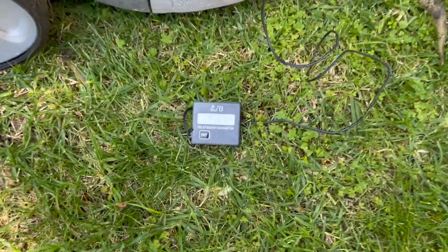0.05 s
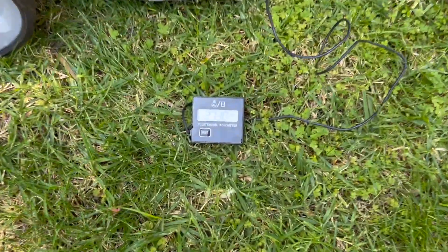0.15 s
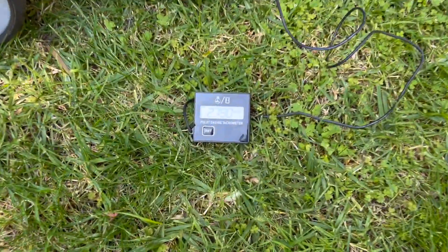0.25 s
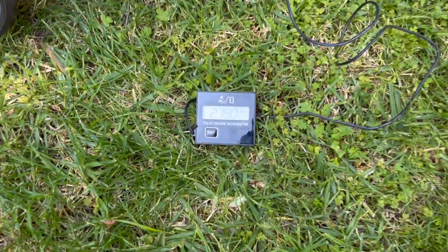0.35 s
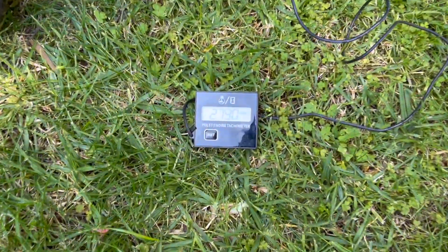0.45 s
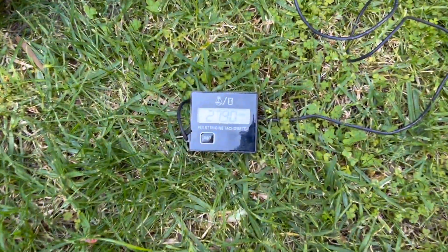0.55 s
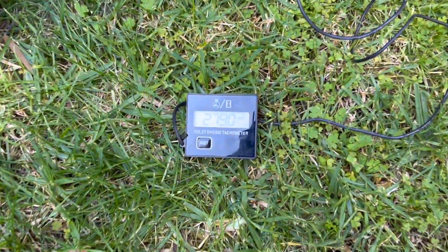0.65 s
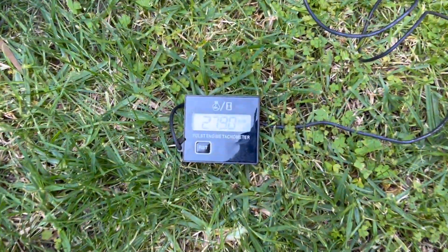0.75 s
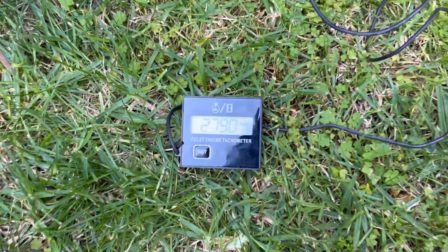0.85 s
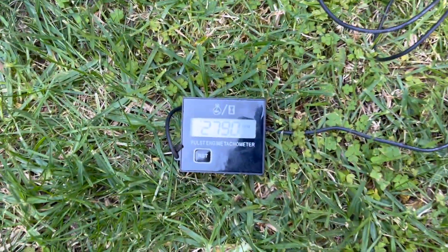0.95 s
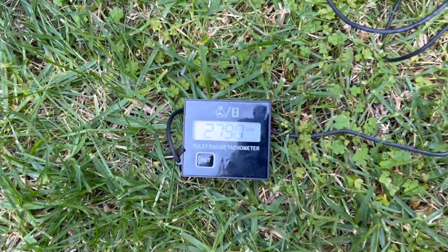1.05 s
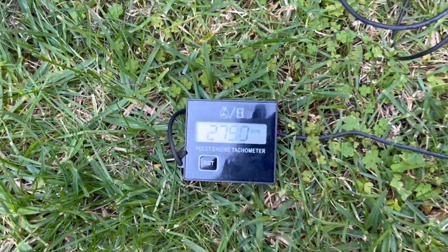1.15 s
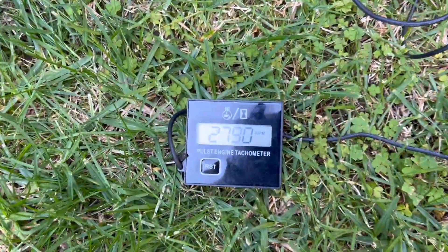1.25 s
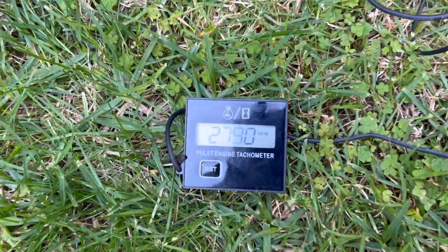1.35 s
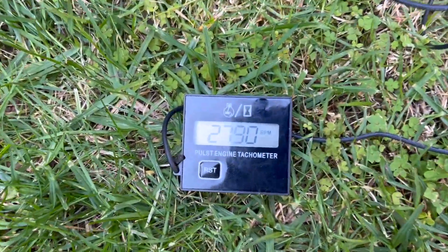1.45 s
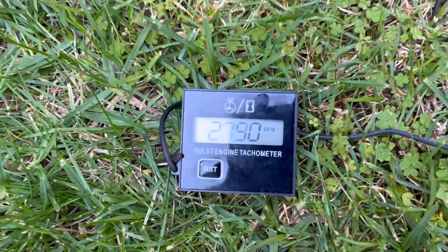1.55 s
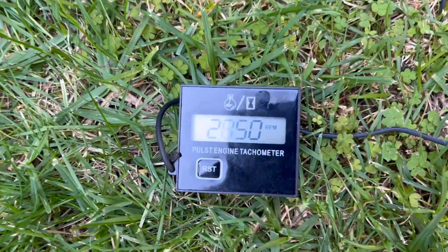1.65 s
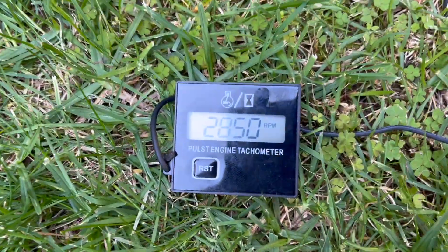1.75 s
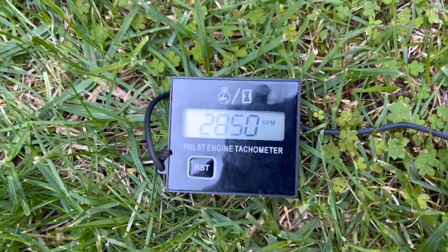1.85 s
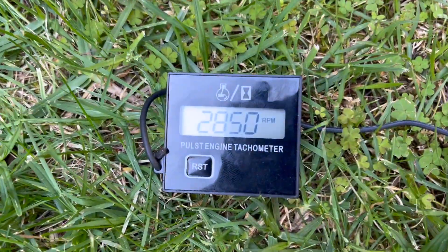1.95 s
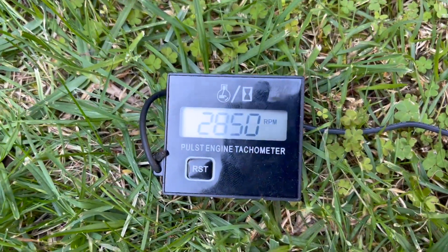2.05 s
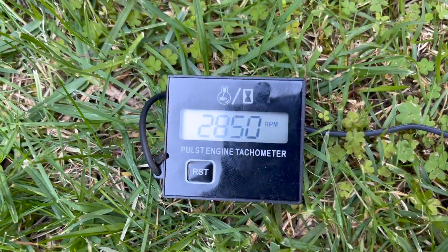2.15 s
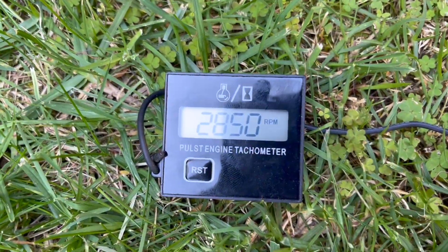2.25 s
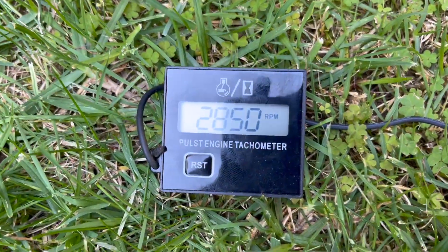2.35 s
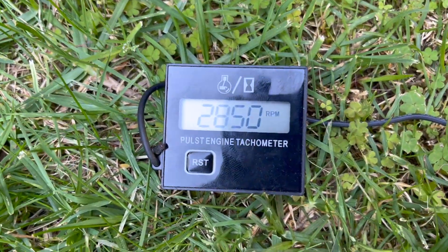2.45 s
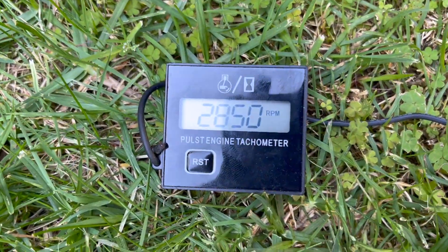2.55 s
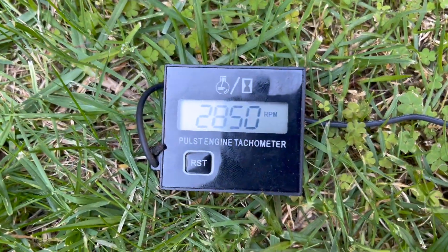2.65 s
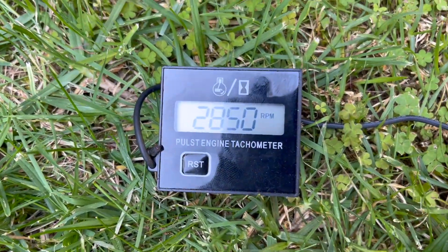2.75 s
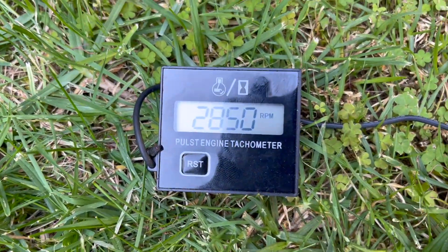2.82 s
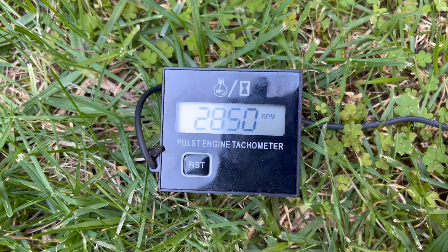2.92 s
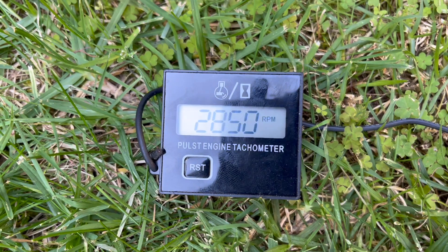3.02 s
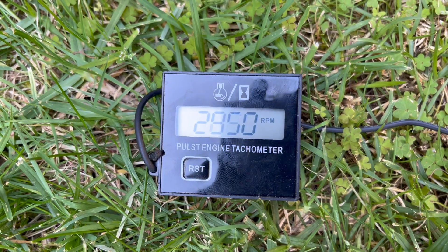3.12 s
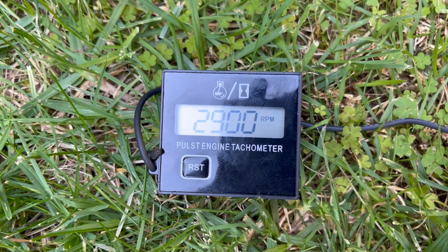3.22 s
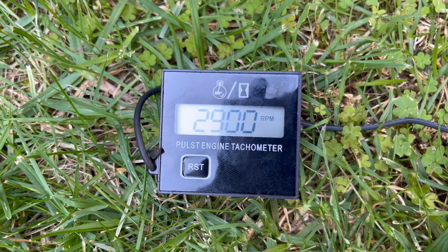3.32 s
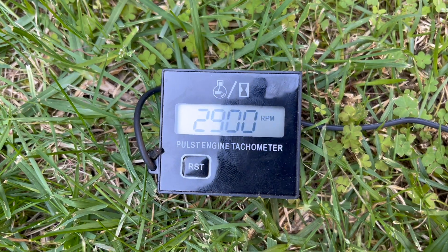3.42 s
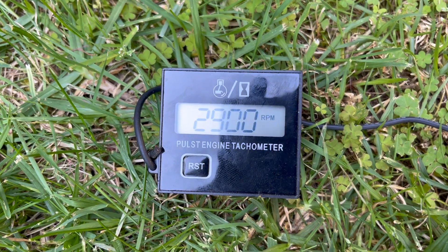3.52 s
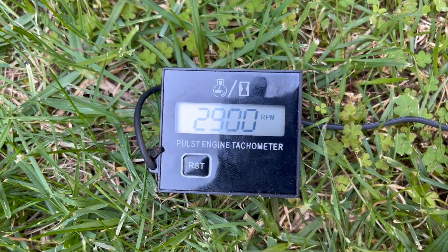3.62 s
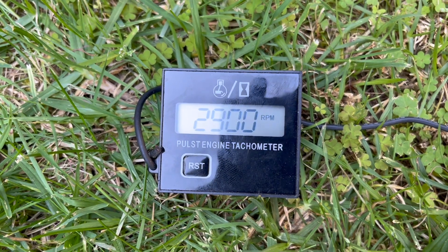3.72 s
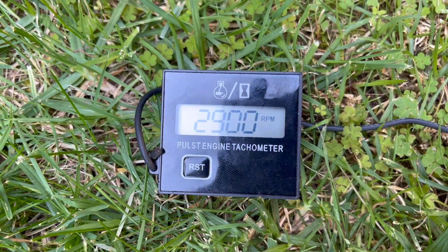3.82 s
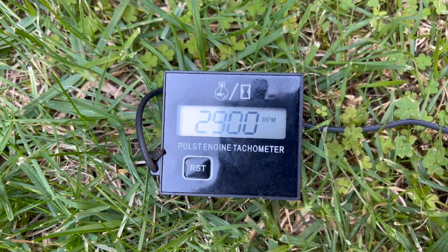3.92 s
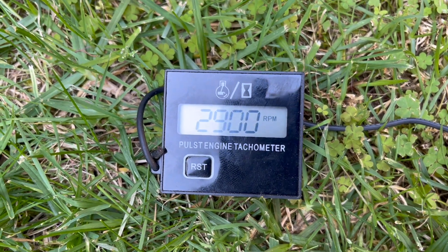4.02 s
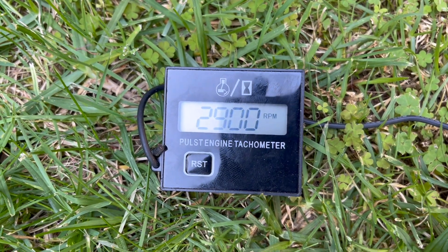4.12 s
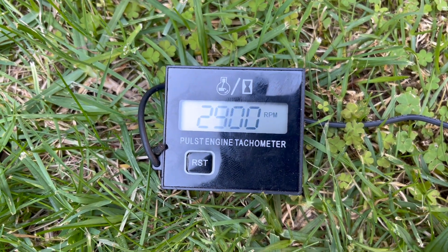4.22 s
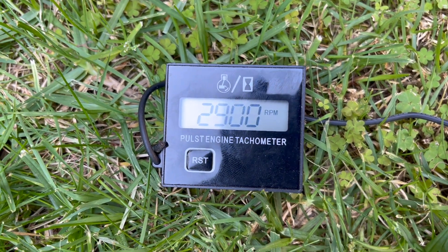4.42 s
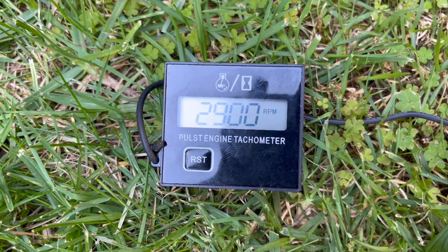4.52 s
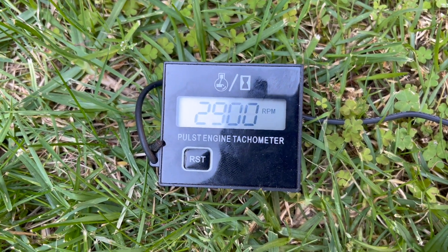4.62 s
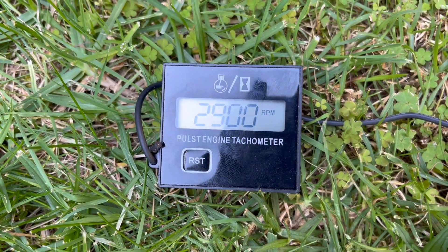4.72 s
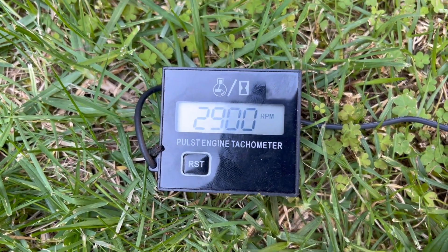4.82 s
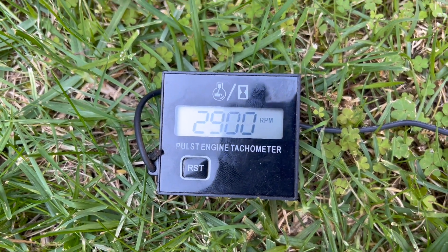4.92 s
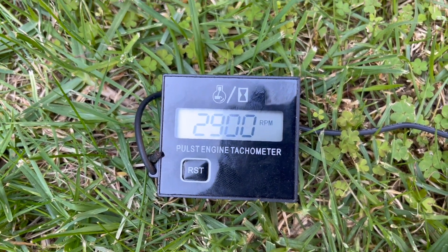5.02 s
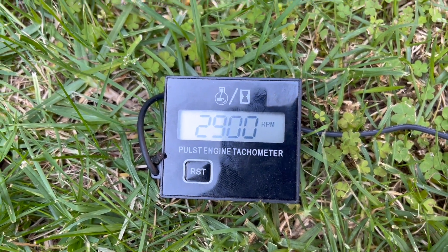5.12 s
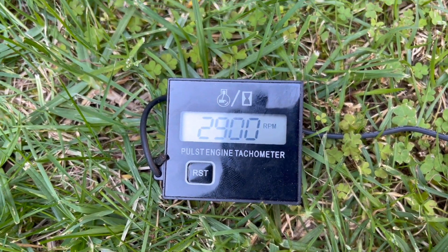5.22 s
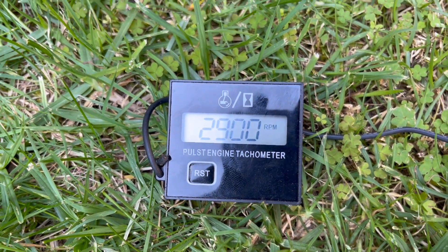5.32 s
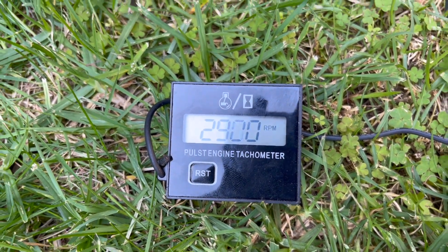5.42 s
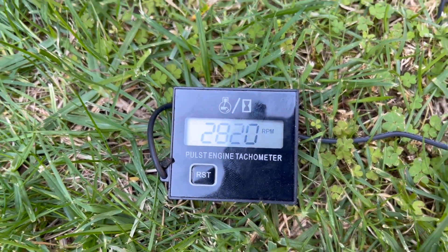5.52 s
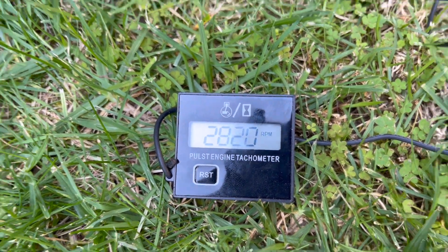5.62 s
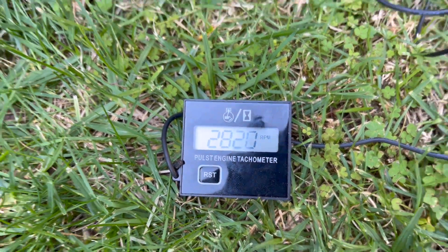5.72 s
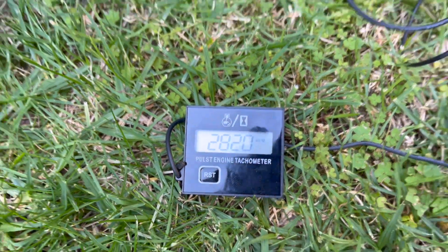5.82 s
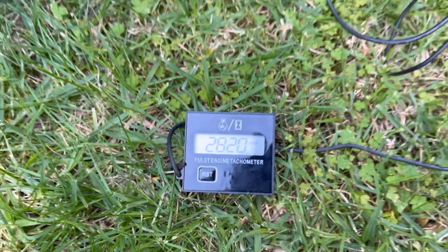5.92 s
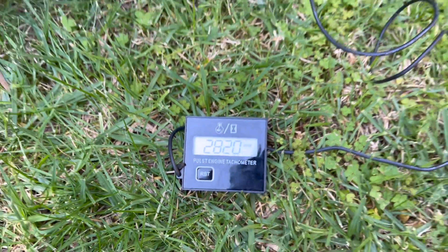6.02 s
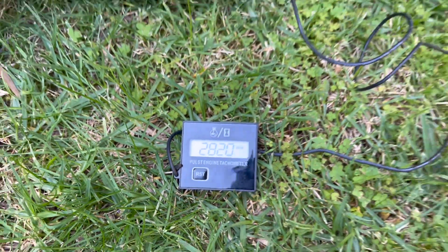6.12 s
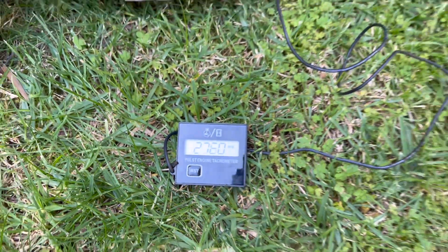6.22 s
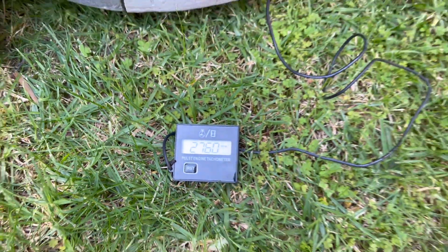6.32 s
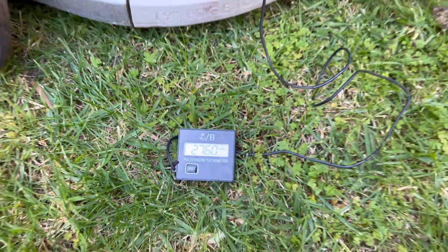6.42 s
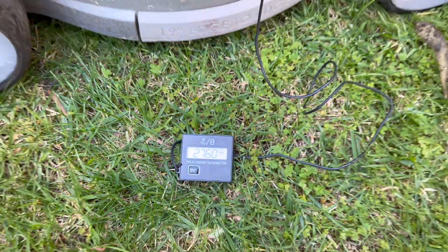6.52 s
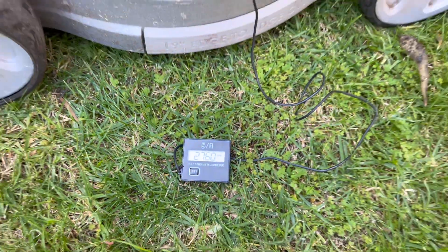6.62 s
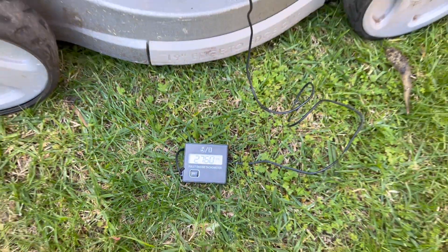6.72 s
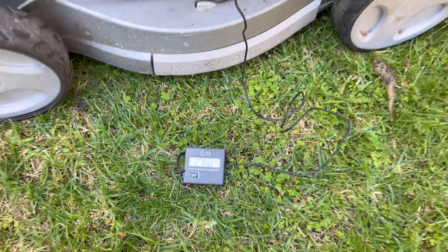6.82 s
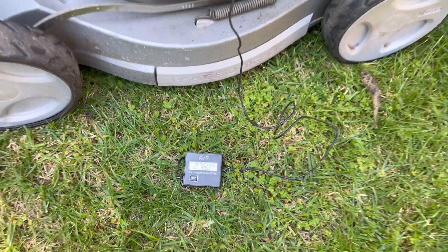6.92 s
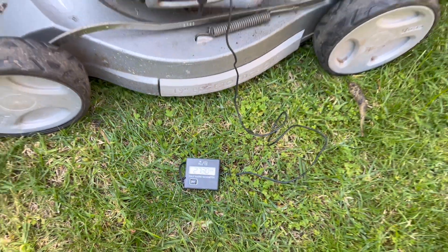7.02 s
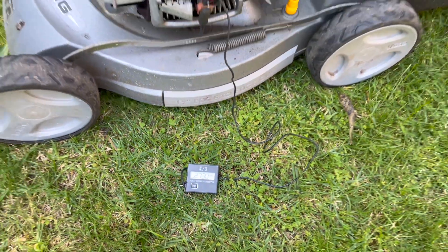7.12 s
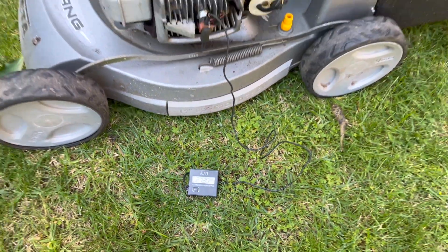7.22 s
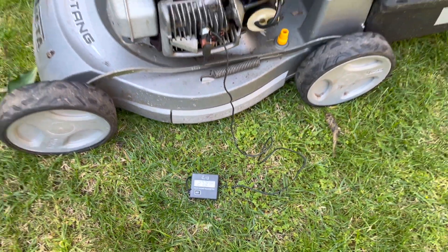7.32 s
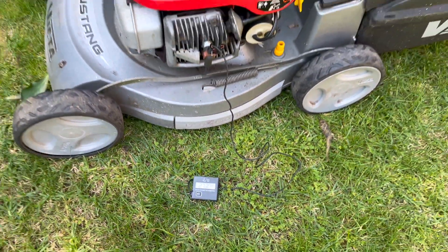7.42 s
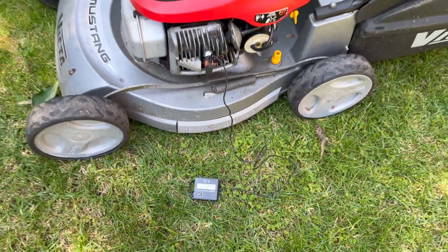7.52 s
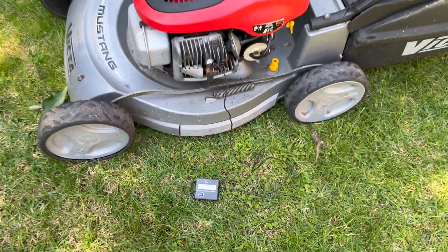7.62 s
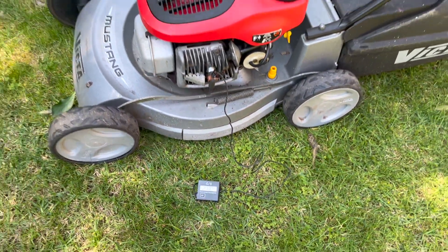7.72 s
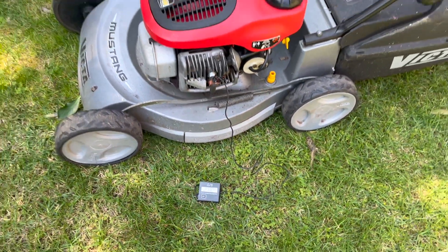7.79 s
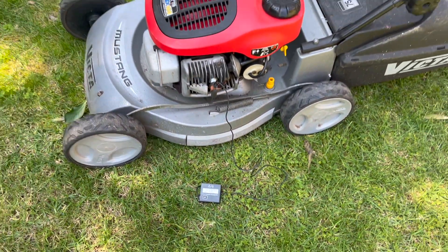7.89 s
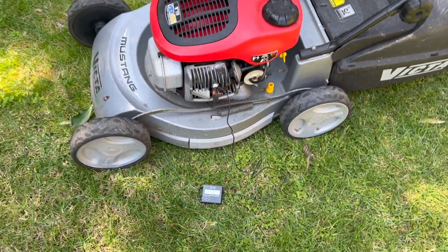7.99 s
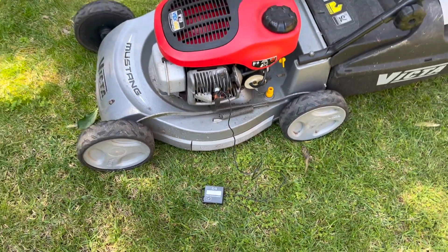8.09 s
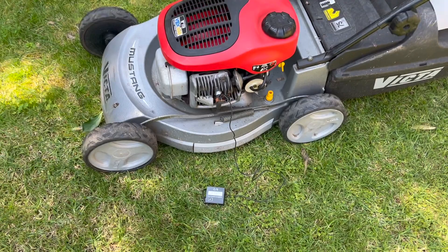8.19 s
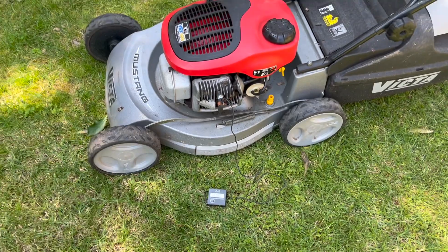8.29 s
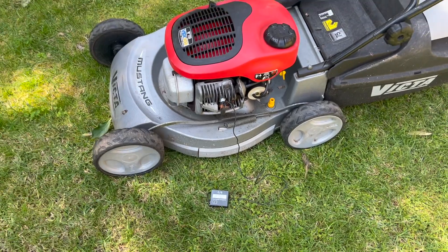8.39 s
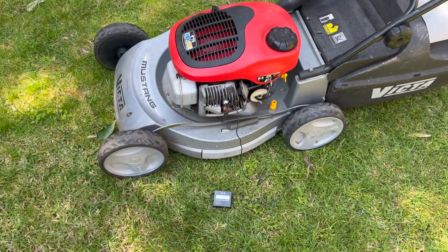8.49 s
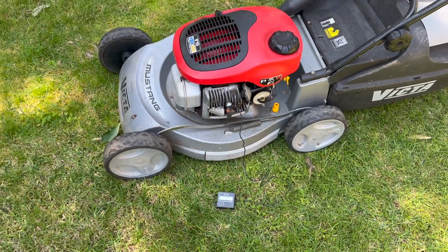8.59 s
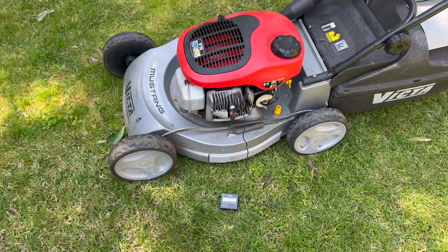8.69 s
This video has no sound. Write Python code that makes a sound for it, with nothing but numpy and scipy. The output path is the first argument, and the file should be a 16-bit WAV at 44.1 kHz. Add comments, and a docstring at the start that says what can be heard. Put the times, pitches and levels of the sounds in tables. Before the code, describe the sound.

A small two-stroke lawn mower runs unloaded on grass from the first instant, loud and fairly near a hand-held stereo microphone. From 0 to 2.4 seconds it hunts: sharp raspy exhaust barks, each with a tiny chirp and hiss, stumble in uneven clusters over muffler thumps. Under them lie a steady low hum near 190 hertz, a deep throb and churned, swishing air. The pitch lifts very slightly to about 3 seconds. From 2.4 to 5 seconds the firing becomes an even putter, roughly twelve a second, with softer barks; close up, dry metallic rattle shows and the treble leans left. Around 5 seconds the rhythm trips, then quickens to about sixteen a second while pitch sags a little. From 6 seconds the microphone backs away: hum, air and thumps fade markedly, leaving a thinner, duller putter. Near 7.7 to 8.1 it stumbles again, still running at the cut, 8.75 seconds.

```python
"""On grass, a two-stroke lawn mower turns 46 to 49 times a second, heard by a hand-held microphone pair
that stoops close and then draws back. Unloaded, it hunts at first, then fires mostly every third or
fourth turn: each firing kicks the shaft, thumps in the muffler and barks at the outlet with a chirp and
a hiss of noise. Beneath, harmonics of the shaft speed make the blade's hum, shaped noise makes the air
churned in the deck, and noise bursts at fixed shaft angles ring the barrel as the piston rattles."""
import sys
import numpy as np
from scipy import signal
from scipy.fft import rfft, irfft, next_fast_len
from scipy.io import wavfile
from scipy.ndimage import map_coordinates

SR = 44100
rng = np.random.default_rng(int(sys.argv[2]) if len(sys.argv) > 2 else 0)


def wav_out(sig):
    """Save sig, one row per channel (or a flat mono array), as 16-bit PCM at SR to the path in sys.argv[1]."""
    wavfile.write(sys.argv[1], SR, np.round(np.clip(np.atleast_2d(sig).T, -1, 1) * 32767).astype(np.int16))


N = 385858

# Base loudness of the parts at the microphones, before trims and beaming. Each row: time in seconds,
# then blade hum, muffler thump, churned air, machinery and outlet ring in dB.
PART_LEVELS = [(0, -15.5, -20.5, -22.5, -32.5, -7.5), (1.1, -16.5, -20, -23.5, -35, -5.5),
               (2.7, -16, -21.5, -25.5, -38, -13), (5.1, -19.5, -24.5, -28.5, -41, -15),
               (6.15, -23, -25.5, -29.5, -42.3, -9.5), (7, -28.5, -31.5, -33.5, -46, -19.5),
               (7.9, -31.5, -37, -37, -47, -16.5), (8.75, -32.5, -36, -38.5, -47, -16)]
# Speed of the shaft, before the surges of firing. Each row: time in seconds, speed in turns per second.
SHAFT_SPEED = [(0, 47.73), (.45, 47.45), (1.05, 47.96), (1.35, 47.47), (2.4, 48.01), (2.9, 48.77),
               (3.3, 48.68), (4.8, 47.77), (5.7, 46.21), (7.2, 46.77), (7.6, 47.32), (8.75, 46.93)]
# Narrow beams that the microphones pass through. Each row: time in seconds, outlet's upper ring in dB,
# fin ring in dB relative to the machinery.
NARROW_BEAMS = [(0, 1, -7), (.8, 2.5, -4), (1.7, 0, -9.5), (3.3, 4, -7.5), (5.2, 2, -9), (6.4, 0, -5),
                (7.4, -8, -9.5), (8.75, -18, -14)]


def amp(db):
    """Amplitude ratio: twenty decibels to each factor of ten."""
    return 10 ** (np.asarray(db) / 20)


def unit(x):
    """Normalisation to an rms of 1."""
    return x / np.sqrt(np.mean(x ** 2) + 1e-20)


def along(points, hz):
    """Interpolation of (Hz, value) points on a logarithmic frequency axis."""
    f, v = np.transpose(points)
    return np.interp(np.log(hz + 1), np.log(f + 1), v)


def curves(rows):
    """Linear interpolation in time: one value per sample for each column after the seconds."""
    seconds, *columns = np.transpose(rows)
    return [np.interp(np.arange(N) / SR, seconds, column) for column in columns]


def wobble(rate):
    """Slow random fluctuation: a smooth curve through `rate` random knots a second."""
    knots = rng.standard_normal(int(N * rate / SR) + 4)
    return map_coordinates(knots, [np.arange(N) * rate / SR])


def filtered(x, response):
    """Linear filtering: the spectrum of x times a complex response of frequency."""
    m = next_fast_len(N + SR // 4, True)
    return irfft(rfft(x, m) * response(np.fft.rfftfreq(m, 1 / SR)), m)[..., :N]


def coloured(x, spectrum):
    """Spectral shaping by a gain in dB, with no phase shift."""
    return filtered(x, lambda hz: amp(along(spectrum, hz)))


def rung(x, modes):
    """Modal resonance: parallel second-order band-passes of alternating sign."""
    def response(f):
        total = 0
        for k, (centre, width, db) in enumerate(modes):
            damping = 1j * f * width
            total = total + (-1) ** k * amp(db) * damping / (centre * centre - f * f + damping)
        return total
    return filtered(x, response)


def causal(spectrum, size=16384):
    """Minimum phase: folding the cepstrum gives the promptest impulse response with this spectrum."""
    cepstrum = irfft(np.log(amp(along(spectrum, np.fft.rfftfreq(size, 1 / SR)))))
    cepstrum[1:size // 2] *= 2
    cepstrum[size // 2 + 1:] = 0
    return irfft(np.exp(rfft(cepstrum)))


def turbulence():
    """Partial coherence: white noise at two microphones, mixed from independent mid and side."""
    # Likeness of the two channels. Each row: frequency in Hz, correlation from 0 to 1.
    likeness = [(100, 0.82), (300, 0.78), (650, 0.67), (1000, 0.72), (1500, 0.064), (2000, 0.58),
                (5000, 0.5), (6500, 1), (7600, 1)]

    def shares(hz):
        turn = np.arccos(np.clip(along(likeness, hz), -1, 1)) / 2
        return np.array([np.cos(turn), np.sin(turn)])
    mid, side = filtered(rng.standard_normal((2, N)), shares)
    return np.array([mid + side, mid - side])


def at_firings(times, sizes, shape):
    """Superposition: one scaled copy of the shape at each firing."""
    places = np.round(times * SR).astype(int)
    impulses = np.bincount(np.maximum(places, 0), sizes, N)
    return signal.fftconvolve(impulses, shape)[:N]


def beamed(standing_db, stooped_db):
    """Directivity: a level in dB that moves between its two ends as the microphones stoop."""
    # Posture. Each row: time in seconds, stoop from 0 (standing back) to 1 (low beside the deck).
    posture = [(0, 0.29), (.7, .55), (2, 0.87), (5.3, 0.91), (6.5, 0.65), (7.4, 0.4), (8.75, 0.13)]
    stoop, = curves(posture)
    return standing_db + (stooped_db - standing_db) * stoop


def shaft(kick=0.016, first_firing_s=.0585, cleared_db=2.5, half_burn_db=-4.5):
    """Impulse and inertia: each firing speeds the shaft up, then it coasts.

    Gives the angle in turns, the firing times in seconds and their strengths in dB."""
    # Firing rhythm. Each row: start in seconds, turns from one firing to the next.
    rhythm = [(0.0, 3), (0.17, 2), (0.26, 3), (0.32, 4), (0.4, 2), (0.45, 3), (0.57, 4), (0.66, 3),
              (0.72, 1), (0.74, 2), (0.78, 3), (0.91, 1), (0.95, 2), (0.99, 3), (1.24, 2), (1.37, 3),
              (1.43, 4), (1.52, 3), (1.58, 4), (1.92, 3), (1.98, 1), (2.0, 2), (2.17, 3), (2.29, 2),
              (2.33, 3), (2.4, 4), (5.05, 3), (5.24, 1), (5.26, 2), (5.3, 3), (7.68, 2), (7.73, 3),
              (7.92, 2), (7.96, 3), (8.02, 4), (8.11, 3), (8.62, 4)]
    t = np.arange(N) / SR
    steady = np.cumsum(curves(SHAFT_SPEED)[0]) / SR
    steady -= np.interp(first_firing_s, t, steady)
    times, gaps = [], []
    while sum(gaps) < steady[-1]:
        times.append(t[np.searchsorted(steady, sum(gaps))])
        gaps.append([gap for start, gap in rhythm if start <= times[-1]][-1])
    times, gaps = np.array(times), np.array(gaps)

    # A firing gains with each doubling of the turns spent clearing the cylinder.
    cleared = np.log2(np.roll(gaps, 1) / np.median(gaps))
    # A half burn is weak and fires again on the next turn.
    half_burn = gaps == 1
    strength_db = cleared_db * cleared + half_burn_db * half_burn

    since = np.interp(t, times, np.arange(len(times))) % 1  # share of the gap gone by
    coast = np.interp(t, times[1:], gaps[:-1])
    surge = coast * (since * (1 - since) - 1 / 6) / 2  # a parabola of angle: speed falls steadily
    return steady + kick * surge, times, strength_db


def blade(turns, angle=0.3886, waver_db=0.65):
    """Blade passing: shaft harmonics, strongest at four a turn; those below the seventh waver slightly."""
    # Hum harmonics, scaled together. Each row: multiple of the shaft speed, relative level in dB.
    harmonics = [(3, -22), (4, 0.5), (5, -13.5), (6, -24.5), (8, -20), (12, -44), (16, -35), (17, -38)]
    hum = 0
    for order, db in harmonics:
        depth_db = waver_db if order < 7 else 0
        level = amp(db + depth_db * wobble(30))
        hum = hum + level * np.cos(2 * np.pi * order * (turns - angle))
    return unit(hum)


def drone(turns, angle=0.24):
    """Forced vibration: the two blade tips shake the deck twice a turn."""
    return unit(np.cos(4 * np.pi * (turns - angle)))


def air(turns, swish=0.37):
    """Turbulence and resonance: churned air swishes twice a turn; steady noise rings cavity and wall."""
    # Spectrum of the churned air. Each row: frequency in Hz, relative level in dB.
    churn_spectrum = [(20, -24), (45, 1), (65, -2.5), (230, 5.5), (340, 0), (440, -2), (540, -1.5),
                      (690, -6.5), (850, -1.5), (1120, -3), (1480, -6), (1680, -10), (2050, -10.5),
                      (2600, -26.5), (5000, -38.5)]
    # Resonances of the deck's cavity. Each row: frequency in Hz, width in Hz, relative level in dB.
    cavity_modes = [(510, 140, -13), (781, 55, -2)]
    # Resonances of the deck's wall. Each row: frequency in Hz, width in Hz, relative level in dB.
    wall_modes = [(1255, 330, 8.6), (1580, 47, 1.5)]
    flow = (1 + swish * np.cos(4 * np.pi * (turns - .18))) * turbulence()
    churn = unit(coloured(flow, churn_spectrum))
    cavity = unit(rung(turbulence(), cavity_modes))
    wall = unit(rung(turbulence(), wall_modes))
    return churn + amp(beamed(-6.5, -16)) * cavity + amp(beamed(2, -11.5)) * wall


def rasp(turns, size=128, rasp_db=-10):
    """Periodicity: the blade sweeps the same ribs and edges each turn, in a slowly shifting mixture."""
    # Spectrum of the rasp. Each row: frequency in Hz, relative level in dB.
    rasp_spectrum = [(250, -5), (400, -3), (560, 1.5), (690, -15), (790, 3), (1150, -5), (1480, 0.5),
                     (1700, -10.5), (2050, -11), (2500, -8), (4000, -56)]
    angle = turns % 1 * size
    sweep = 0
    for _ in range(6):
        ribs = rng.standard_normal(size)
        sweep = sweep + wobble(8) * map_coordinates(ribs, [angle], mode="grid-wrap")
    return amp(rasp_db) * unit(coloured(sweep, rasp_spectrum))


def machinery(turns, knock_life_s=0.0051, scatter_db=2, rush_db=-3.0, fan_share=0.33, knock_share=0.84):
    """Impact excitation: piston knocks ring the barrel and its fins, over the rush of the cooling fan."""
    # Piston knocks. Each row: angle as a share of the turn, mean level in dB.
    piston_knocks = [(0.226, 4.5), (0.412, 1.5), (.54, -27)]
    # Resonances of the barrel. Each row: frequency in Hz, width in Hz, relative level in dB.
    barrel_modes = [(1900, 73, 5.5), (3300, 150, -8.5), (3800, 130, -3), (4550, 97, -1.5), (5110, 120, 4.5),
                    (5180, 390, -2.5), (7000, 230, -9)]
    # Resonances of the fins. Each row: frequency in Hz, width in Hz, relative level in dB.
    fin_modes = [(5330, 90, 2), (5680, 380, 0)]
    # Spectrum of the rush. Each row: frequency in Hz, relative level in dB.
    rush_spectrum = [(900, -34), (2200, 3.5), (3200, 7), (3900, 3.5), (5300, -3), (7000, -3), (10000, -5.5),
                     (12000, -5.5), (14000, -28), (16000, -53)]
    speed = curves(SHAFT_SPEED)[0]
    knocks = []
    for angle, db in piston_knocks:
        turn, part = np.divmod(turns - angle, 1)
        sizes = amp(db + scatter_db * rng.standard_normal(size=512))
        decay = np.exp(-part / speed / knock_life_s)
        knocks.append(sizes[turn.astype(int) % len(sizes)] * decay)
    rattle = sum(knocks)
    barrel = unit(rung((fan_share + rattle) * turbulence(), barrel_modes))
    fins = unit(rung((fan_share + knocks[0]) * turbulence(), fin_modes))  # only the first knock
    rush = unit(coloured((1 + knock_share * rattle) * turbulence(), rush_spectrum))
    fin_db = curves(NARROW_BEAMS)[1]
    return amp(beamed(-23, -0.5)) * barrel + amp(fin_db) * fins + amp(rush_db) * rush


def barks(times, strength_db, ring_scatter_db=0.5, jet_scatter_db=1.56):
    """Sudden gas release: a front chirps upward through the ringing outlet as a brief jet hisses."""
    # Spectrum of the jet. Each row: frequency in Hz, gain in dB.
    jet_spectrum = [(250, -25), (750, 6.5), (1400, 5), (1800, 2.5), (2500, 5.5), (3800, 2.5), (5500, 2.5),
                    (7200, 3.5), (10500, -0.5), (11800, 1), (14500, -0.5), (16000, 0)]
    # Lower ring of the outlet. Each row: frequency in Hz, width in Hz, gain in dB.
    lower_modes = [(2330, 167, 0), (2618, 59, 0)]
    # Upper ring of the outlet, before beaming. Each row: frequency in Hz, width in Hz, gain in dB.
    upper_modes = [(3335, 650, -1.1), (3418, 200, -0.43)]
    jet_db, chirp_db, blast_db = 15.0, -1.0, -3
    rise_s, jet_life_s, swell_s = 0.0042, .0032, 0.0011
    start_hz, end_hz, glide_s = 2100, 3700, 0.0023

    seconds, _, _, air_db, _, ring_db = np.transpose(PART_LEVELS)
    peak_db = np.interp(times, seconds, ring_db) + strength_db
    hiss_db = np.interp(times, seconds, air_db) + strength_db
    hiss_db = hiss_db + jet_scatter_db * rng.standard_normal(len(times))

    t = np.arange(SR // 25) / SR
    opening = 1 - np.exp(-(t / rise_s) ** 2)
    puff = 2 * opening * np.exp(-t / jet_life_s)
    jet = at_firings(times - .0005, amp(hiss_db + jet_db), puff)
    pressure = t / swell_s * np.exp(1 - t / swell_s)
    pitch = end_hz + (start_hz - end_hz) * np.exp(-t / glide_s)
    chirp = pressure * np.sin(2 * np.pi * np.cumsum(pitch) / SR)
    blast = at_firings(times - .001, amp(peak_db + blast_db), pressure) * turbulence()
    rings = []
    for modes in lower_modes, upper_modes:  # each firing shares itself out differently between the two
        sizes = amp(peak_db + chirp_db + ring_scatter_db * rng.standard_normal(len(times)))
        front = at_firings(times - .0008, sizes, chirp)
        rings.append(rung(blast + front, modes))
    upper_db = curves(NARROW_BEAMS)[0]
    return coloured(jet * turbulence(), jet_spectrum) + rings[0] + amp(upper_db) * rings[1]


def thumps(times, strength_db, delay_s=0.00507, follow=0.36, scatter_db=0.05, chamber_hz=46, width_hz=54):
    """All-pass delay: each firing's low pulse crosses a muffler chamber that holds back the deepest bass."""
    # Spectrum of a pulse. Each row: frequency in Hz, relative level in dB.
    pulse_spectrum = [(15, -44.5), (30, -33.5), (45, -10), (60, 3.5), (130, 3.5), (200, 3.5), (270, 2),
                      (320, -7.5), (380, -9.5), (430, -19.5), (680, -21), (1100, -29.5), (2500, -57)]
    sizes = amp(follow * strength_db + scatter_db * rng.standard_normal(len(times)))
    pushes = at_firings(times + delay_s, sizes, causal(pulse_spectrum))

    def chamber(hz):
        return np.exp(-2j * np.arctan2(hz * width_hz, chamber_hz ** 2 - hz ** 2))
    return unit(filtered(pushes, chamber))


def scene(hum_trim_db=1.5, drone_db=-4.5, air_trim_db=2.5, machine_trim_db=3):
    """Superposition and bearing: all parts sum, with level differences between the two channels."""
    # Shading of the far side. Each row: frequency in Hz, share of the treble bearing from 0 to 1.
    shading = [(380, 0), (700, 0.42), (1300, 0.14), (1800, 0), (2600, 0.9), (4800, 0.45), (6500, 0.33),
               (7800, 0)]
    turns, times, strength_db = shaft()
    hum_db, thump_db, air_db, machine_db, _ = curves(PART_LEVELS)
    sides = np.array([[.5], [-.5]])  # times a level of left minus right
    hum = amp(hum_db + hum_trim_db + sides * beamed(-1, 5)) * blade(turns)
    low = hum + amp(thump_db) * (thumps(times, strength_db) + amp(drone_db) * drone(turns))

    churned = amp(air_db + air_trim_db) * (air(turns) + rasp(turns))
    rattling = amp(machine_db + machine_trim_db) * machinery(turns)
    high = churned + rattling + barks(times, strength_db)
    # The body that carries the microphones shades the treble on the far side.
    shaded = filtered(high, lambda hz: along(shading, hz))
    return low + high + shaded * (amp(sides * beamed(3, 13)) - 1)


def record(dry, top_hz=15800):
    """Interchannel phase: the treble reaches the channels out of step, and a sharp band limit ends it."""
    # Phase between the channels. Each row: frequency in Hz, lead of the left in radians.
    left_lead = [(300, 0), (1000, .3), (2800, .35), (4800, -.2), (6800, -1.7), (8300, -3.14),
                 (11800, -6.28), (15300, -9.42), (16500, -10.5)]

    def response(hz):
        lead = np.interp(hz, *np.transpose(left_lead))
        return np.exp(.5j * np.array([lead, -lead])) * (hz < top_hz)
    return filtered(dry, response)


dry = scene()
out = record(dry)
wav_out(out)
```